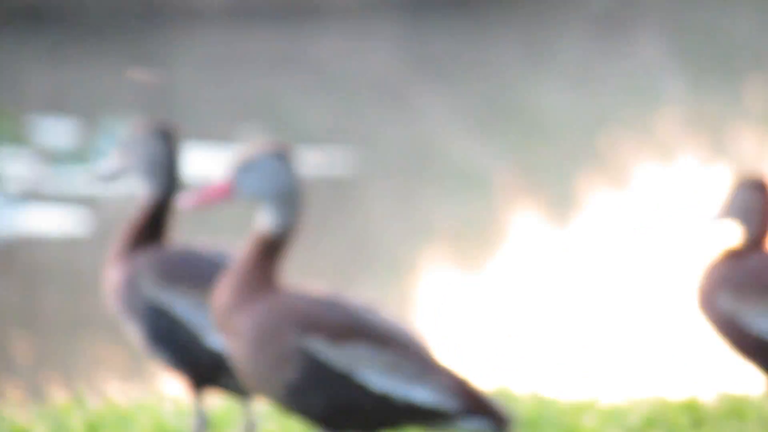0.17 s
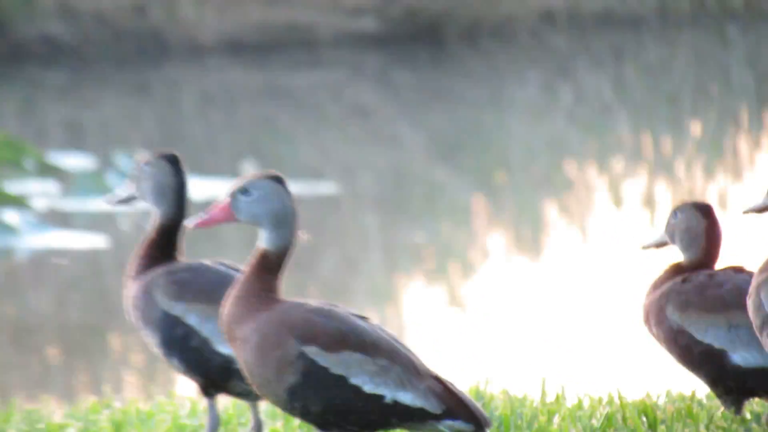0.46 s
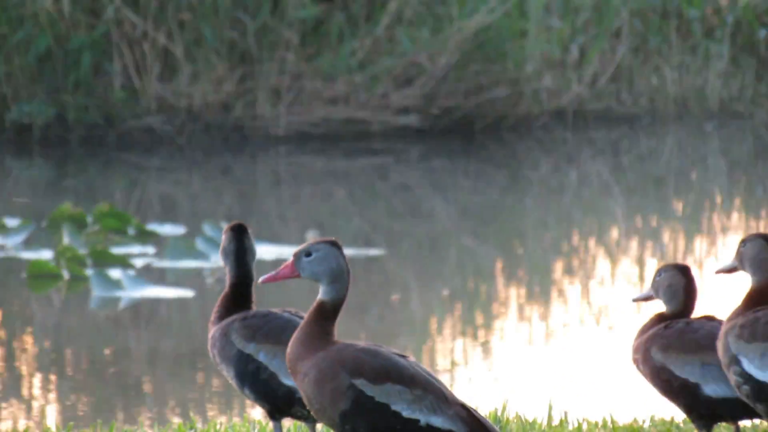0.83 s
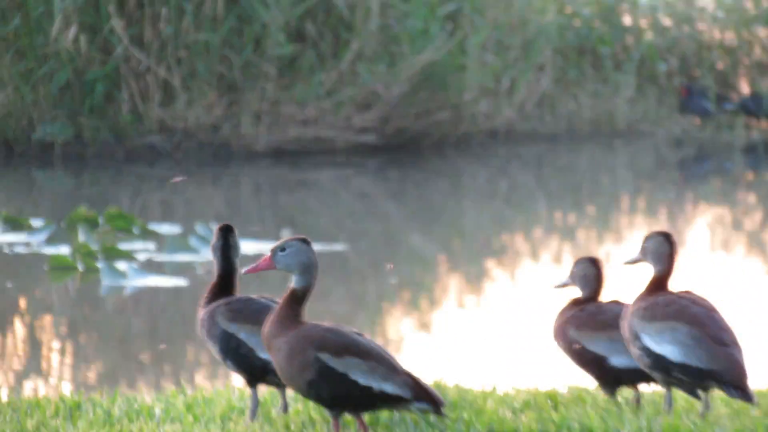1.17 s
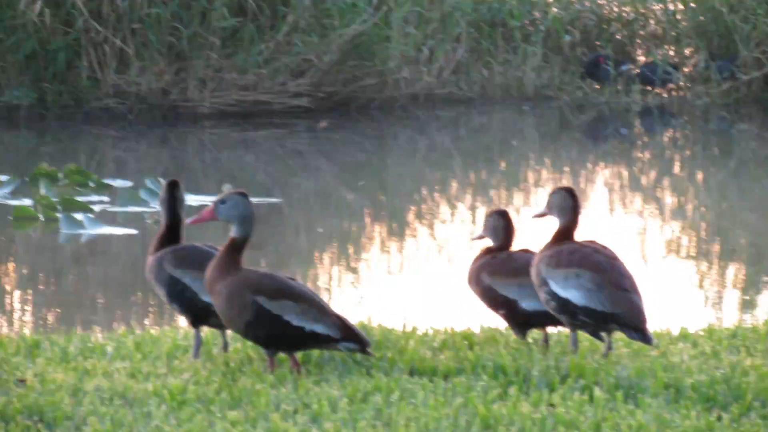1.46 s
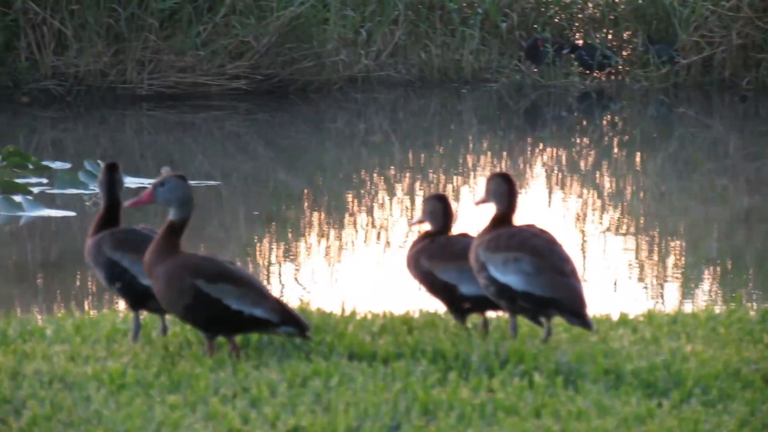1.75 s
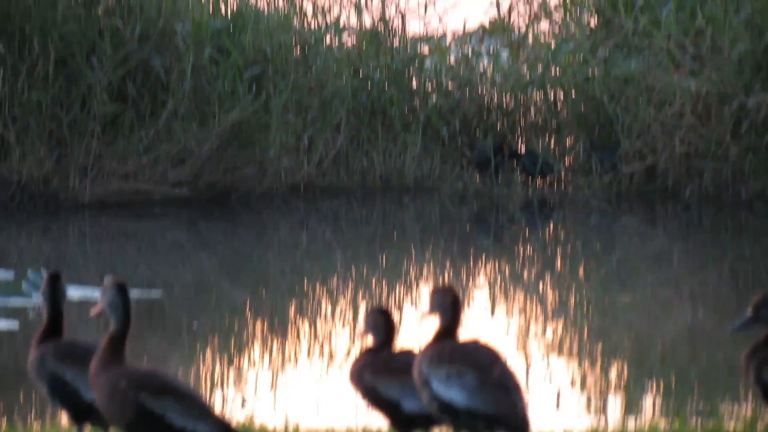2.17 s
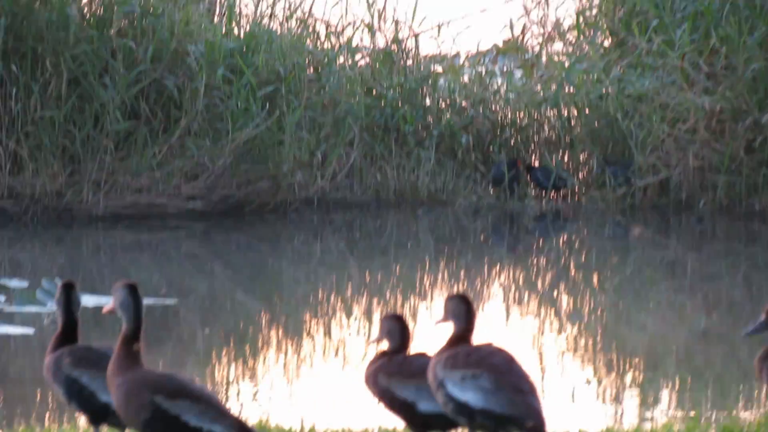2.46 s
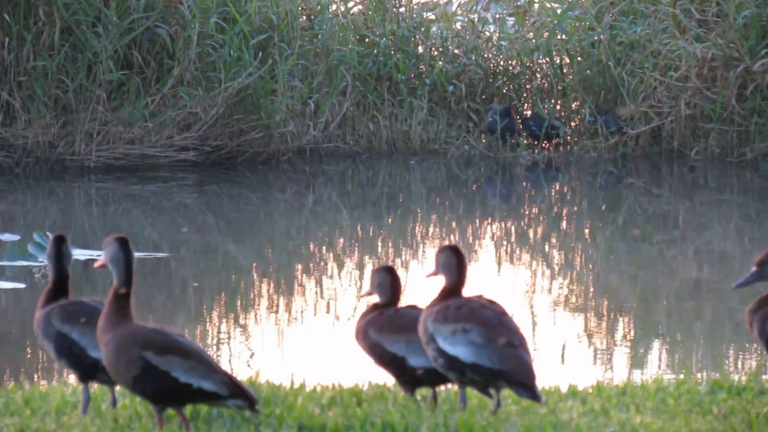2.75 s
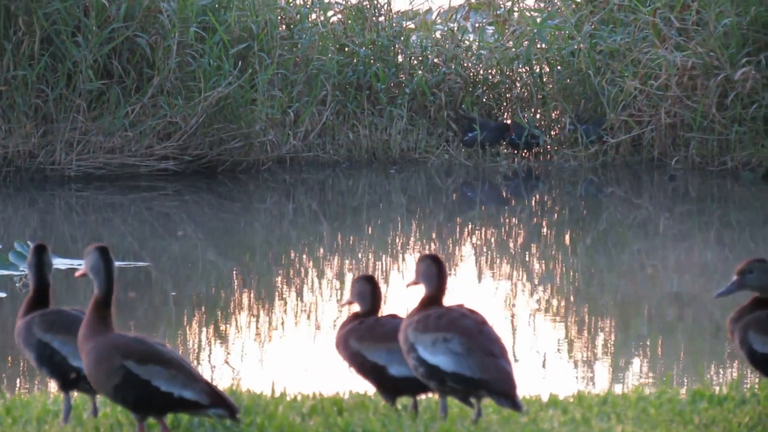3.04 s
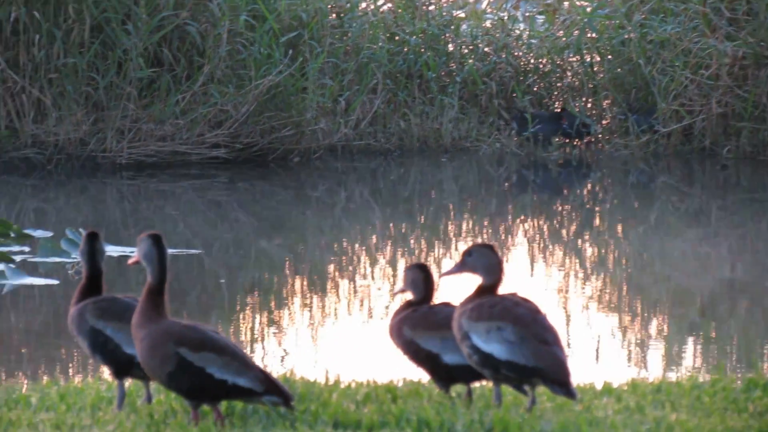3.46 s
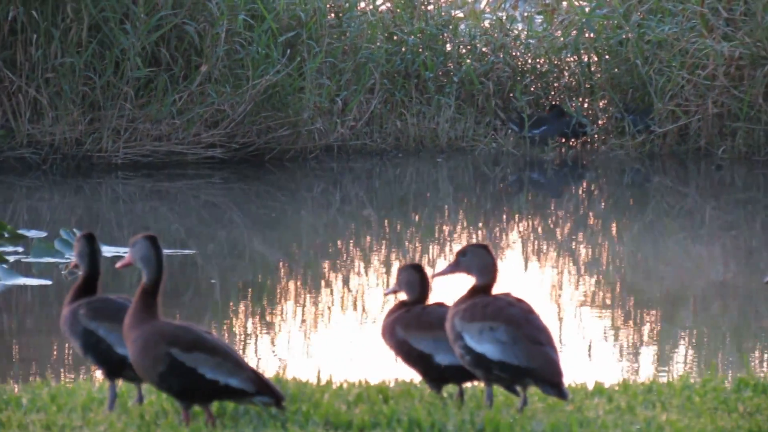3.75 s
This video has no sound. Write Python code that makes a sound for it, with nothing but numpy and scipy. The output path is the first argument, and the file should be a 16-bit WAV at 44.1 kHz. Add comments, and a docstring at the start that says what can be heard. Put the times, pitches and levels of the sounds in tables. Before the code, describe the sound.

Ducks by a pond twitter in quick runs, then give louder, drawn-out whistles from the right. Distant traffic rumbles throughout. Close to the microphone, a camera zoom hisses softly at first and the camera body clicks a few times.

```python
"""Whistling ducks at a pond

Ducks twitter in quick runs, then give louder drawn-out whistles from the right: gliding harmonic tones
filtered by the throat. A small bird chips, and the far bank throws the calls back over distant traffic.
A camera's zoom hisses for the first second and a half, and its body clicks in the hand."""
import sys
import numpy as np
from scipy import signal
from scipy.io import wavfile
from scipy.ndimage import uniform_filter1d

SR = 44100
rng = np.random.default_rng(int(sys.argv[2]) if len(sys.argv) > 2 else 0)


def put_to_file(sound):
    """Save the sound as 16-bit audio at rate SR, in the file named by the first command-line argument."""
    columns = np.atleast_2d(sound).T  # one column per channel
    safe = np.clip(columns, -1, 1)
    whole_steps = np.round(safe * 32767)
    wavfile.write(sys.argv[1], SR, whole_steps.astype(np.int16))


N = 172431
T = np.arange(N) / SR

# Noise spectra: frequency_hz, gain_db
TRAFFIC_SPECTRUM = [(15, -46), (25, -19.5), (64, -1.5), (123, -2.5), (275, -16), (480, -16.5), (867, -12.5),
                    (1500, -25.3), (1950, -36.5), (3300, -120)]
AIR_SPECTRUM = [(800, 10), (2000, 0.5), (4000, -5.5), (8000, -10), (15000, -23)]
ZOOM_SPECTRUM = [(600, 2), (1700, 6), (5500, -2), (9000, -8.5), (11500, -8.5), (15000, -19)]
# Level contours: time_s, level_db
TRAFFIC_CONTOUR = [(0.05, -38.5), (1.29, -33.5), (3.9, -35)]
ZOOM_CONTOUR = [(.15, -54.5), (1.15, -43.5), (1.45, -46), (1.5, -105)]
FLOCK_CONTOUR = [(0, -57), (1.2, -47.5), (1.6, -58), (2.2, -68), (2.8, -56), (3.0, -46)]
# Left-right likeness of the traffic: frequency_hz, coherence
TRAFFIC_COHERENCE = [(30, 0.66), (120, 0.99), (400, 0.5), (1200, 0.15), (3000, 0.11)]
# Distant engine tones: pitch_hz, level_db
ENGINE_HUMS = [(124, -48.5), (480, -60.5)]
# Reverberation of the bank: frequency_hz, t60_s
BANK_DECAY = [(1500, 0.12), (3300, 0.5), (7000, 0.7)]
# Camera clicks: start_s, level_db, brightness_db
BODY_CLICKS = [(.04, -29, 7), (0.131, -37.5, 9), (1.303, -29.5, 7.5), (1.4569, -27, 4.5), (2.3404, -20, -9),
               (2.673, -20, 8)]
# Camera body resonances: frequency_hz, gain_db, t60_s
BODY_MODES = [(1464, -3, 0.021), (1755, 6.5, .018), (2440, -0.5, 0.013), (5010, -1.5, 0.0055)]
# Small bird's chips: start_s, decay_s, level_db
BIRD_CHIPS = [(1.455, .07, -49.5), (1.919, .007, -40)]
# Duck's source harmonics, fundamental first: gain_db
SOURCE_HARMONICS = [-1, -1.5, -4, -9]
# Throat response: frequency_hz, gain_db
THROAT_RESPONSE = [(1700, -16), (2300, -7), (3300, 2), (4300, -3.5), (5300, -3), (6600, -10.5),
                   (10000, -17), (15000, -52)]
# Direction of the ducks: frequency_hz, left_minus_right_db
DUCK_BALANCE = [(2000, -12), (3300, -15), (4300, -8), (6500, -9.5)]
# Note shapes: length_s, vertex_fraction, sag_fraction, overtones_db, tilt_db_per_harmonic
TWIT = (.037, .65, .12, -3.5, -5)  # bright and hooked
PEEP = (.034, .85, .11, -6, 0)  # rising to a level top
ARCH = (.045, .5, .35, -7, 0)  # flicking up and down
SLUR = (.04, .05, .13, 11, 3)  # falling, strong in overtones
SWEEP = (.048, 1.5, .5, -14, -3)  # rising steeply into a long whistle
# Runs of each shape: top_pitch_hz, level_db, [start_s, ...]
TWIT_RUNS = [(2880, -50, [.072]), (2690, -37, [.866, .954]), (2620, -34, [1.04, 1.125, 1.208]),
             (2570, -38.5, [1.292, 1.383])]
PEEP_RUNS = [(3170, -45.5, [.3, .56, .745, .84]), (3330, -42, [1.305, 1.402]), (3480, -39, [2.556]),
             (3420, -32, [2.594, 2.627, 2.685]), (3330, -34.5, [2.774, 2.863]), (4100, -42, [2.886]),
             (3480, -33, [2.969]), (3620, -36, [3.058, 3.157, 3.646]), (3600, -31, [3.74, 3.822])]
ARCH_RUNS = [(3500, -50, [.193, .655]), (3950, -47, [.501, 1.103, 1.345, 1.455]),
             (4020, -46, [1.572, 1.7, 1.809, 1.922, 2.032]), (3720, -46, [.874, 1.213]),
             (3760, -41, [2.085]), (3420, -40, [1.149]), (3720, -52, [2.129]), (2880, -38, [2.628, 3.106]),
             (3400, -34.5, [3.839])]
SLUR_RUNS = [(2630, -60, [.152, .276, .399, .522, .645]), (1840, -61, [1.636, 1.742, 1.853, 1.961]),
             (2000, -58.5, [2.369])]
SWEEP_RUNS = [(4800, -36, [3.353, 3.588]), (4680, -38, [3.755])]
# Drawn-out whistles: overtones_db, [(time_s, pitch_hz, level_db), ...]
LONG_WHISTLES = [ (-12, [(.988, 4550, -45), (1.028, 2850, -46)]), (10, [(2.458, 1834, -65),
                 (2.488, 2130, -53), (2.51, 2230, -47.5), (2.54, 2190, -52)]), (-13, [(2.5, 3180, -43.5),
                 (2.56, 2870, -36)]), (-1, [(2.866, 1800, -47), (2.887, 2430, -38), (2.922, 2420, -41),
                 (2.938, 2660, -41), (3.0, 2730, -43), (3.08, 3000, -39), (3.13, 2950, -36),
                 (3.153, 2244, -40)]), (10, [(2.94, 2460, -55), (3.05, 2550, -52), (3.13, 2530, -52)]),
                 (-14, [(2.933, 3080, -30), (2.97, 3150, -35), (3.03, 3514, -31.5), (3.075, 3960, -35.5),
                 (3.135, 4030, -37)]), (-6, [(3.197, 2256, -33), (3.214, 2770, -36), (3.24, 2900, -34.5),
                 (3.27, 2820, -37), (3.291, 2360, -35)]), (-10, [(3.362, 2750, -47), (3.396, 3230, -31),
                 (3.492, 3320, -32.5), (3.511, 3170, -29), (3.537, 2300, -37)]), (-9, [(3.624, 3350, -32),
                 (3.657, 3330, -30), (3.68, 3010, -31.5), (3.702, 2400, -39)]), (-11, [(3.791, 3260, -28.5),
                 (3.82, 3004, -33.5), (3.836, 2470, -32)])]

BAND_LIMIT_HZ = 15850


def amp(db):
    """Amplitude ratio of a level in decibels."""
    return 10 ** (np.asarray(db) / 20)


def unit_rms(x):
    """Normalisation to unit power."""
    return x / np.sqrt(np.mean(x ** 2) + 1e-20)


def at_frequency(table, hz):
    """Interpolation on a logarithmic frequency axis."""
    frequencies, values = np.transpose(table)
    return np.interp(np.log(hz + 1), np.log(frequencies), values)


def add(mix, start_s, sound):
    """Superposition of a delayed sound on the mix."""
    part = mix[..., max(round(start_s * SR), 0):][..., :sound.shape[-1]]
    part += sound[..., :part.shape[-1]]


def smooth(x, seconds):
    """Low-pass filtering by a running mean."""
    return uniform_filter1d(x, max(int(seconds * SR), 1))


def waver(seconds, size=N):
    """Random modulation: low-passed noise of unit power."""
    return unit_rms(smooth(smooth(rng.standard_normal(size), seconds), seconds))


def noise(spectrum, patch_db, coherence):
    """Partially coherent stereo noise whose spectrum fluctuates in patches."""
    hz = np.fft.rfftfreq(4096, 1 / SR)
    a, b, c, d, patches = rng.standard_normal((5, N // 1024 + 5, len(hz)))
    patches = unit_rms(uniform_filter1d(uniform_filter1d(patches, 4, axis=0), 16, axis=1))
    shared = np.clip(coherence(hz), -.99, .99)
    left = a + 1j * b
    right = shared * left + np.sqrt(1 - shared ** 2) * (c + 1j * d)
    frames = np.array([left, right]) * spectrum(hz) * amp(patch_db * patches)
    return unit_rms(signal.istft(frames.swapaxes(1, 2), nperseg=4096, noverlap=3072)[1][:, :N])


def noise_band(centre_hz, width_hz, coherence):
    """Narrow-band noise with a Gaussian spectrum."""
    return noise(lambda hz: np.exp(-.5 * ((hz - centre_hz) / width_hz) ** 2), 0, lambda hz: coherence)


def air():
    """Broadband hiss, nearly incoherent between left and right."""
    return amp(-49.7) * noise(lambda hz: amp(at_frequency(AIR_SPECTRUM, hz)), .7, lambda hz: .1)


def traffic():
    """Distant traffic: low-frequency noise with faint, frequency-modulated engine tones."""
    road = noise(lambda hz: amp(at_frequency(TRAFFIC_SPECTRUM, hz)), 1.5,
                 lambda hz: at_frequency(TRAFFIC_COHERENCE, hz))
    hum = sum(amp(db) * np.sqrt(2) * np.sin(2 * np.pi * np.cumsum(hz + 4 * waver(.0726)) / SR)
              for hz, db in ENGINE_HUMS)
    return road * amp(np.interp(T, *np.transpose(TRAFFIC_CONTOUR))) + hum


def bank_reverb(sound):
    """Scattering from reeds and trees: each band decays exponentially at its own rate."""
    returns = rng.standard_normal((2, SR)) * (rng.random((2, SR)) < .05) * np.minimum(T[:SR] / .004, 1)
    hz, t, bands = signal.stft(returns, SR, nperseg=256)
    decay = amp(-60 * t / at_frequency(BANK_DECAY, hz)[:, None])
    tail = signal.istft(bands * decay, SR, nperseg=256)[1]
    tail /= np.linalg.norm(tail[0])
    return signal.fftconvolve(sound[1:], tail, axes=1)[:, :N] * amp([[-4], [0]])


def zoom_drive(stop_s=1.45):
    """Machine noise: the lens drive gives broadband hiss and narrow-band hum until it stops."""
    hiss = noise(lambda hz: amp(at_frequency(ZOOM_SPECTRUM, hz)), 1, lambda hz: 0)
    hiss *= amp(np.interp(T, *np.transpose(ZOOM_CONTOUR))) * amp([[-3], [1]])
    hum = noise_band(centre_hz=207.4, width_hz=20, coherence=1)
    return hiss + hum * amp(-45) * smooth(1. * (T < stop_s), .018)


def camera_clicks(rise_s=.00072, snap_decay_s=.0027):
    """Impulse excitation: a noisy snap, and the damped modes of the plastic body ring."""
    out, t = np.zeros((2, N)), T[:SR // 20]
    lead_turns = np.array([[.29], [0]])  # the left channel leads in phase
    for start_s, db, brightness_db in BODY_CLICKS:
        ring = 0
        for k, (hz, mode_db, t60_s) in enumerate(BODY_MODES):
            envelope = amp(mode_db + brightness_db * (k > 1) - 60 * t / t60_s)
            ring += envelope * np.sin(2 * np.pi * (hz * t + k / 2 + lead_turns))
        snap = uniform_filter1d(rng.standard_normal((2, len(t))), 3)
        snap *= amp(-9.5 + brightness_db) * np.exp(-t / snap_decay_s)
        add(out, start_s, amp(db) * (ring + snap) * np.minimum(t / rise_s, 1))
    return out * amp([[-4.5], [0]])


def small_bird(rise_s=.008):
    """Thin, rough chips: a high noise band, amplitude-modulated by decaying pulses."""
    envelope = 0
    for start_s, decay_s, db in BIRD_CHIPS:
        rise = np.clip((T - start_s) / rise_s, 0, 1) ** 2
        envelope += amp(db) * rise * np.exp(-np.maximum(T - start_s - rise_s, 0) / decay_s)
    return envelope * noise_band(centre_hz=6570, width_hz=770, coherence=.5)


def whistle(pitch_hz, level_db, overtones_db, tilt_db=0):
    """Source and filter: wavering harmonics, each higher one raspier, are shaped by the throat."""
    attack_s, release_s, glide_s = .007, .008, .007
    jitter, shimmer_db, waver_s = .0057, 2, .0055
    rasp_db, rasp_s = -23, .0005
    size = len(pitch_hz)
    t, out = T[:size], 0
    fundamental_hz = smooth(pitch_hz, glide_s) * (1 + jitter * waver(waver_s, size))
    for k, source_db in enumerate(SOURCE_HARMONICS, 1):
        hz = k * fundamental_hz
        phase = 2 * np.pi * np.cumsum(hz) / SR
        # breathy noise sidebands
        rasp = waver(rasp_s, size) * np.cos(phase) + waver(rasp_s, size) * np.sin(phase)
        tone = np.sin(phase) + k * amp(rasp_db) * rasp
        timbre_db = source_db + (overtones_db + tilt_db * (k - 2)) * (k > 1)
        flicker_db = shimmer_db * np.sqrt(k) * waver(waver_s, size)
        gain = amp(timbre_db + at_frequency(THROAT_RESPONSE, hz) + flicker_db) * (hz < BAND_LIMIT_HZ)
        balance = np.array([amp(at_frequency(DUCK_BALANCE, hz)), np.ones(size)])
        out += tone * gain * balance
    envelope = np.minimum(t / attack_s, 1) * np.minimum((t[-1] - t) / release_s, 1)
    return 2 * out * envelope * amp(level_db)


def note(shape, top_hz, level_db):
    """Frequency modulation: a short whistle whose pitch follows part of a parabola."""
    length_s, vertex, sag, overtones_db, tilt_db = shape
    offset = np.linspace(0, 1, int(length_s * SR)) - vertex
    glide = 1 - sag * offset ** 2 / np.max(offset ** 2)
    return whistle(top_hz * glide / glide.max(), level_db, overtones_db, tilt_db)


def far_flock(count=120, top_range_hz=(2400, 3700), overtones_db=-4):
    """Independent sources: ducks farther off twitter at random times and pitches."""
    out, shapes = np.zeros((2, N)), [TWIT, ARCH, SLUR]
    for i, (when, height, pick) in enumerate(rng.random((count, 3))):
        start_s = (i + when) / count * T[-1]
        *glide, _, tilt_db = shapes[int(pick * len(shapes))]
        top_hz = np.interp(height, [0, 1], top_range_hz)
        level_db = np.interp(start_s, *np.transpose(FLOCK_CONTOUR))
        add(out, start_s, note((*glide, overtones_db, tilt_db), top_hz, level_db))
    return out


def near_ducks():
    """Superposed calls: runs of short notes, and long whistles on pitch and level contours."""
    out = np.zeros((2, N))
    for shape, runs in [(TWIT, TWIT_RUNS), (PEEP, PEEP_RUNS), (ARCH, ARCH_RUNS),
                        (SLUR, SLUR_RUNS), (SWEEP, SWEEP_RUNS)]:
        for top_hz, db, starts in runs:
            for start_s in starts:
                add(out, start_s, note(shape, top_hz, db))
    for overtones_db, contour in LONG_WHISTLES:
        times, hz, db = np.transpose(contour)
        t = np.arange(times[0], times[-1], 1 / SR)
        add(out, times[0], whistle(np.interp(t, times, hz), np.interp(t, times, db), overtones_db))
    return out


def scene():
    """Direct and reflected sound add; the far flock has the largest reverberant share."""
    birds, flock, clicks = near_ducks() + small_bird(), far_flock(), camera_clicks()
    out = np.zeros((2, N))
    for direct, reverb_db in [(birds, -10.5), (clicks, -12.5), (flock, -4)]:
        out += direct + amp(reverb_db) * bank_reverb(direct)
    add(out, .062, amp(-19) * birds)  # one distinct echo
    return out + zoom_drive() + traffic() + air()


def record(dry, silence_s=.035):
    """A gate opens after a moment of silence; a low-pass filter limits the bandwidth."""
    gate = np.clip((T - silence_s) / .00079, 0, 1)
    low_pass = signal.firwin(511, BAND_LIMIT_HZ, window=("kaiser", 9), fs=SR)
    return signal.oaconvolve(dry * gate, low_pass[None], "same")


dry = scene()
out = record(dry)
put_to_file(out)
```